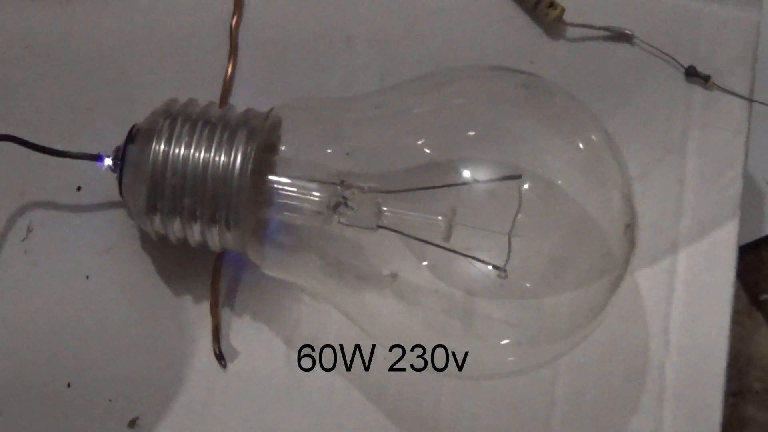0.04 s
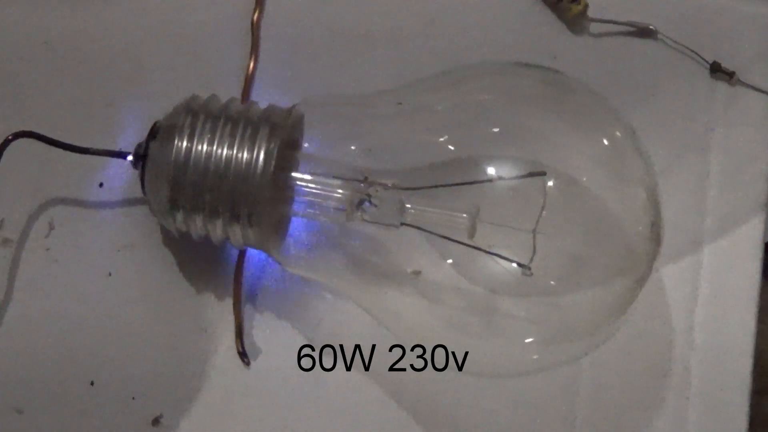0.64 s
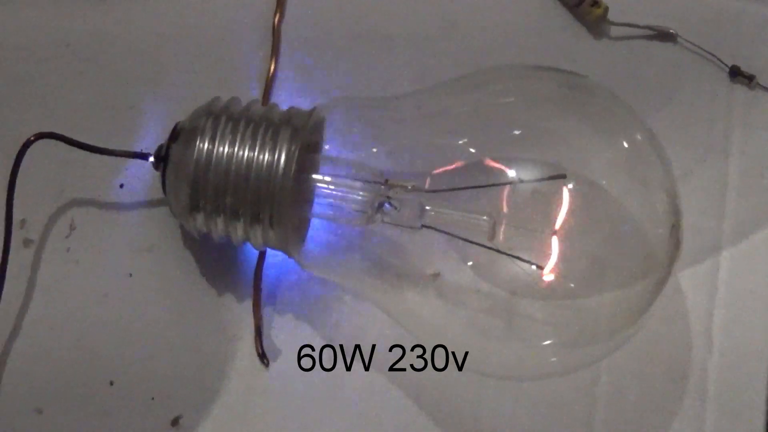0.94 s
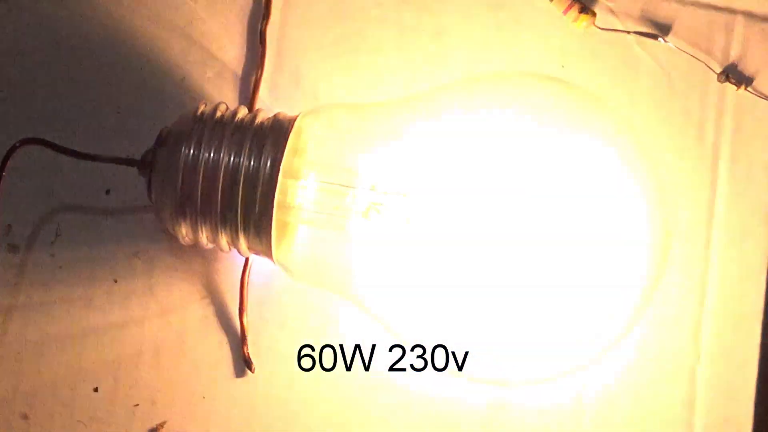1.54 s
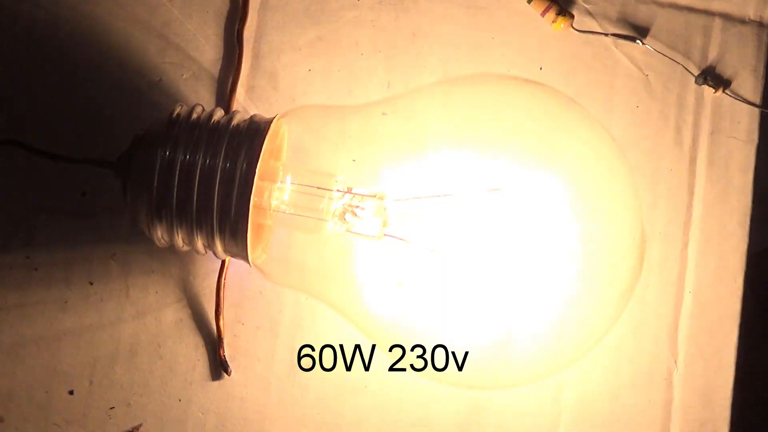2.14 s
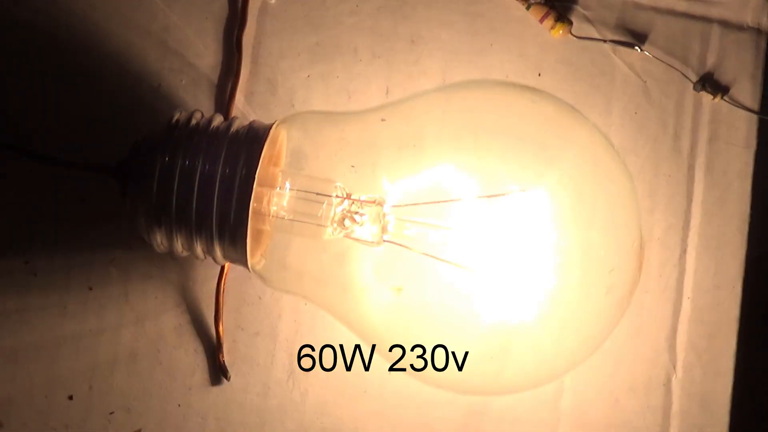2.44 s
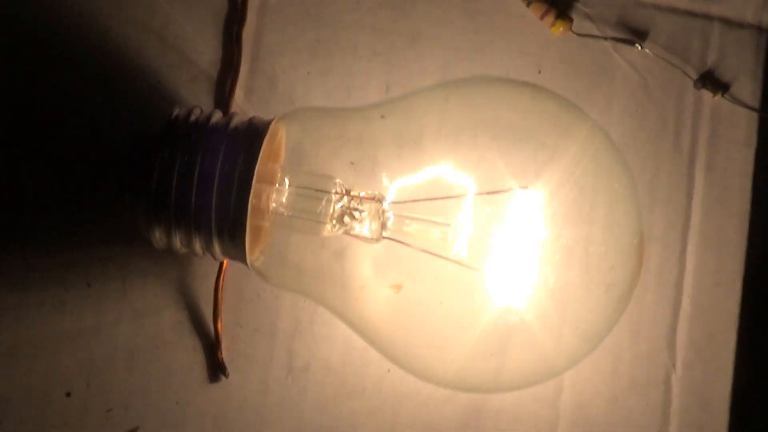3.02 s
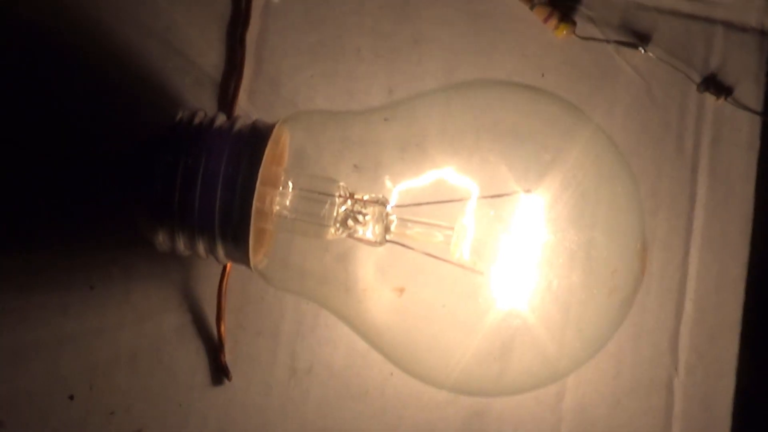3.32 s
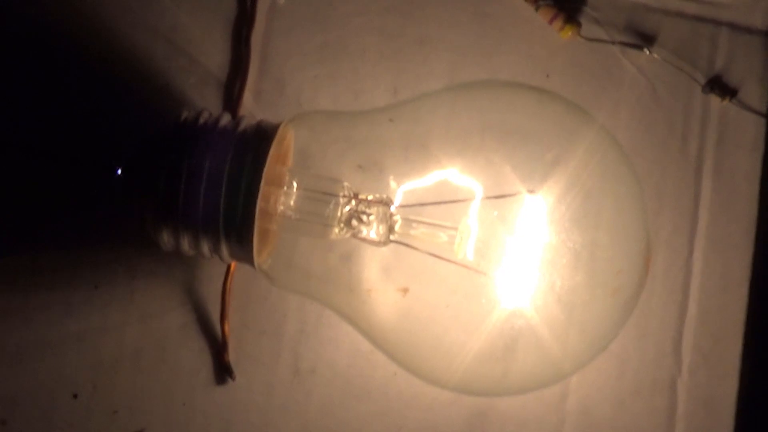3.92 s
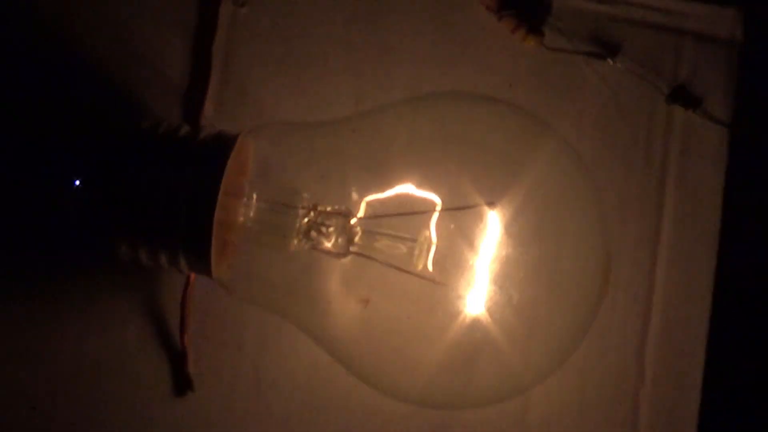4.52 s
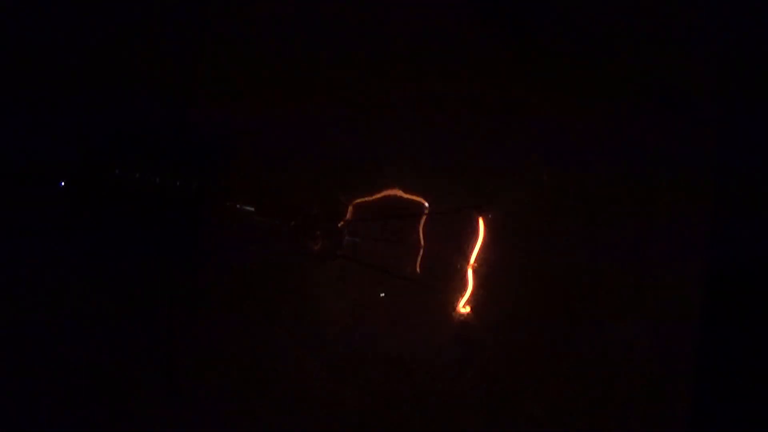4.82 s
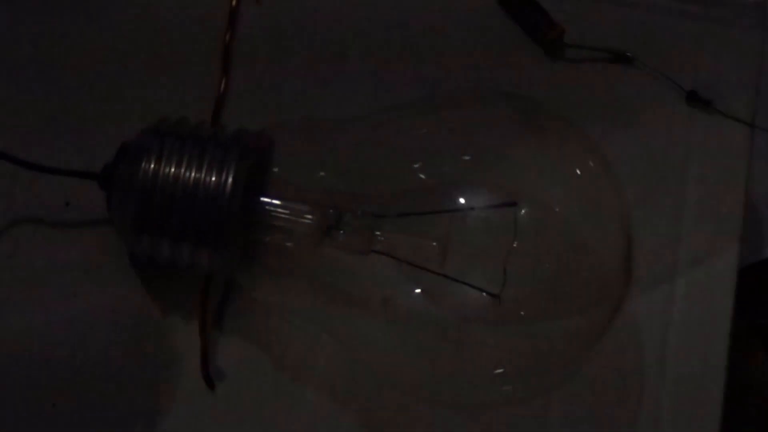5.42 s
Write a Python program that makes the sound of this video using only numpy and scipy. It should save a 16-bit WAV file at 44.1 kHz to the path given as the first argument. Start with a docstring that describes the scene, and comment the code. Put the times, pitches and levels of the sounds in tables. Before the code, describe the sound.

Sparks spit rapidly at a light bulb's metal cap over the quiet rattling buzz of a power supply. After about a second they merge into a loud, harsh sizzle, with a few sharp cracks and a faint low buzz underneath. The arc wavers, throws hissing sprays, surges again and sputters out abruptly. A few faint ticks remain, all heard close up in a small quiet room.

```python
"""A high-voltage discharge at the cap of a light bulb, on a table in a small room, close to a stereo pair.
First the dimmed mains supply knocks at each firing, and sparks spit in every half cycle. After a second
the power is turned up and they merge into a harsh sizzle; from 2.4 s the loaded core buzzes once a cycle.
Later the arc wavers and throws sprays of streamers. The supply is turned down with a tinnier knock,
the arc sputters out at 4.8 s, and a few faint ticks are left over the room air."""
import sys
import numpy as np
from scipy import signal
from scipy.fft import rfft, irfft
from scipy.io import wavfile
from scipy.ndimage import uniform_filter1d

SR = 44100
rng = np.random.default_rng(int(sys.argv[2]) if len(sys.argv) > 2 else 0)


def to_wav(sig):
    """Store sig (one row per channel, or 1-D mono) as 16-bit WAV at the path in sys.argv[1].

    Samples outside -1..1 are clipped; the rate is SR.
    """
    pcm = np.clip(np.atleast_2d(sig), -1, 1) * 32767
    pcm = np.round(pcm).astype(np.int16)
    wavfile.write(sys.argv[1], SR, pcm.T)  # frames by channels


N = 249606
TIME, BINS = np.arange(N) / SR, np.fft.rfftfreq(N, 1 / SR)
MAINS_HZ, CROSSING_S = 50, -.0015  # the mains and one of its zero crossings
SPUTTER_S = 4.801  # the arc breaks up here


def amp(db):
    """Decibels to gain."""
    return 10 ** (np.asarray(db) / 20)


def unit(x):
    """Scales to rms 1."""
    return x / np.sqrt(np.mean(x ** 2) + 1e-20)


def steadied(x, size=1300):
    """Holds the short-term rms at 1."""
    return x / np.sqrt(abs(uniform_filter1d(uniform_filter1d(x ** 2, size), size)) + 1e-12)


def curve(rows, t=TIME, column=1):
    """One column of a table, joined by straight lines in time."""
    rows = np.array(rows)
    return np.interp(t, rows[:, 0], rows[:, column])


def spectrum(points, hz=BINS):
    """Points joined by straight lines on a log-frequency axis."""
    f, value = np.transpose(points)
    return np.interp(np.log(hz + 1), np.log(f), value)


def gate(start, length, rise_s, fall_s):
    """Attack, hold and exponential release."""
    return np.clip((TIME - start) / rise_s, 0, 1) * np.exp(-np.maximum(TIME - start - length, 0) / fall_s)


def shaped(x, gain):
    """Filters by a gain for each frequency bin."""
    return irfft(rfft(x) * gain, N)


def coloured(x, db):
    """Causal filter: clicks keep a sharp front and ring afterwards."""
    cepstrum = irfft(np.log(amp(db)), N)
    cepstrum[1:N // 2] *= 2
    cepstrum[N // 2 + 1:] = 0
    return shaped(x, np.exp(rfft(cepstrum)))


def ring(x, modes):
    """Damped resonances of a struck body."""
    return shaped(x, sum(amp(db) / (1 + 1j * (BINS ** 2 - hz ** 2) / (width * BINS + 1e-9))
                         for hz, width, db in modes))


def clicks(times, sizes):
    """Impulses at the given times."""
    at = np.round(times * SR).astype(int)
    inside = (at >= 0) & (at < N)
    return np.bincount(at[inside], sizes[inside], N)


# Stereo width of the air and echoes, almost mono in the top treble: f/Hz, side against mid/dB
SIDE_LEVEL = [(50, -30.5), (125, -23), (280, -5), (1000, -5.5), (3000, -4.5), (8000, -4), (13000, -19.5)]
def diffuse(mid, side):
    """Spreads sound to left and right, narrow in the bass and the top treble."""
    side = shaped(side, amp(spectrum(SIDE_LEVEL)))
    return np.array([mid + side, mid - side])


# Colour of the air all around the table: f/Hz, level/dB
AIR_COLOUR = [(20, -21), (50, -8), (90, -5), (150, -4), (215, 1), (300, -7.5), (420, -5.5), (620, -11.5),
              (720, -3), (1000, -6.5), (1700, -14), (5000, -17), (15800, -24.5)]
# Room tone at the microphones: t/s, air level/dB, hum level/dB
ROOM_TONE = [(0, -63.5, -82), (1.5, -63, -77), (2.2, -57.5, -85), (4.85, -54, -69), (5.2, -57, -68)]
def room_tone():
    """Quiet, wide room air with a faint mains hum in the centre."""
    air = diffuse(*shaped(rng.standard_normal((2, N)), amp(spectrum(AIR_COLOUR))))
    hum = np.sqrt(2) * np.sin(2 * np.pi * 2 * MAINS_HZ * TIME)
    return unit(air) * amp(curve(ROOM_TONE)) + hum * amp(curve(ROOM_TONE, column=2))


# The dimmer, firing earlier for more power: t/s, delay after the zero crossing/ms
FIRING_DELAY = [(0, 3.5), (.25, 2.52), (.9, 2.53), (1.27, 0.74), (4.55, .75), (4.72, 1.28), (4.94, 3.5)]
def knock(levels, modes, edge_hz, uneven_db=2.0, skew_ms=0.28, lag_ms=0.12, scatter_db=0.5):
    """Each firing jolts the supply; late firings are shaky and differ between the two half cycles."""
    count = np.arange(int(2 * MAINS_HZ * N / SR))
    crossings, odd = CROSSING_S + count / (2 * MAINS_HZ), count % 2
    delay_ms = curve(FIRING_DELAY, crossings)
    shaky = np.clip((delay_ms - .6) / 2, 0, 1)
    unsteady = (crossings > .1) & (crossings < .93)
    jitter_ms = np.where(unsteady, .13, .06) * rng.standard_normal(len(count))
    delay_ms = delay_ms + lag_ms + shaky * (skew_ms * (1 - odd) + jitter_ms)
    sizes = amp(shaky * (uneven_db * odd + scatter_db * rng.standard_normal(len(count))))
    jolts = clicks(crossings + delay_ms / 1000, sizes)
    band_db = spectrum([(200, -14), (400, 0), (edge_hz, 0), (0.98 * edge_hz, -12), (3 * edge_hz, -22)])
    ringing = steadied(coloured(ring(jolts, modes), band_db))
    return ringing * amp(curve(levels)) * (TIME >= levels[0][0]) * (TIME < levels[-1][0])


# Knock of the supply, close by: t/s, level/dB
OPENING_KNOCK = [(0, -49), (.2, -45), (1.08, -42), (1.3, -51), (1.7, -51.5), (2.05, -68)]
# Resonances of its body: f/Hz, width/Hz, level/dB
OPENING_MODES = [(402, 17, -27), (490.7, 11, 4), (737, 18, -31), (891, 35, 9), (990, 41, 2.5),
                 (1157, 106, 7.5), (1280, 54, 4.5), (1390, 53, 0.5), (1689, 95, 9), (1986, 200, 1),
                 (2670, 170, -3)]
def opening_knock():
    """The dimmed supply rings at every firing and fades once the power is up."""
    return knock(OPENING_KNOCK, OPENING_MODES, edge_hz=2700)


def sparks(per_s, size_db, burst_db=2.0, strike_ms=2.5, rise_ms=0.53, burn_ms=5.6, quench_ms=0.89):
    """The gap breaks down again and again, from strike_ms into each half cycle until the voltage fails."""
    delay_ms = curve(FIRING_DELAY)
    halves = 2 * MAINS_HZ * (TIME - CROSSING_S - strike_ms / 1000)
    age_ms = halves % 1 * 1000 / (2 * MAINS_HZ)
    burst = (1 - np.exp(-age_ms / rise_ms)) / (1 + np.exp((age_ms - burn_ms) / quench_ms))
    burst *= amp(-2.6 * age_ms * np.maximum(delay_ms - 1, 0))  # fades sooner after a late firing
    # The earlier the firing, the more sparks burn on between bursts.
    carry = np.exp(-delay_ms / .72) / (1 + (delay_ms / 2) ** 4)
    drive = carry + (1 - carry) * burst
    strikes = rng.random(N) < per_s / SR * np.sqrt(drive)
    # Bursts differ less from one another once they merge.
    burst_scatter = (1 - carry) * rng.standard_normal(N)[np.floor(halves).astype(int)]
    scatter_db = size_db * np.minimum(rng.standard_normal(N), 1.6) + burst_db * burst_scatter
    return steadied(strikes * drive ** (1 / 4) * amp(scatter_db) * rng.choice([-1, 1], N))


# One spark at close range: f/Hz, level/dB
SPARK_COLOUR = [(100, -45.5), (700, -32), (1400, -23.5), (2100, -17.5), (2600, -15), (3050, -19),
                (3600, -8), (4900, -10), (6800, -6), (7500, 0.5), (11100, -1), (12300, -13), (14000, -27),
                (16000, -26)]
# Peaks and hollows from the bulb and table beside it: f/Hz, width/Hz, gain/dB
BULB_RIPPLE = [(4334, 110, -4), (6170, 260, 2), (6390, 120, -7), (8300, 33, -0.5), (8270, 96, -7.5),
               (8790, 127, -4), (9340, 242, 10), (9468, 272, -8), (9800, 380, -1.5), (12310, 230, -16)]
def spark_colour():
    """Spectrum in dB of one spark near glass and table."""
    ripple_db = sum(db * np.exp(-.5 * ((BINS - hz) / width) ** 2) for hz, width, db in BULB_RIPPLE)
    return spectrum(SPARK_COLOUR) + ripple_db


# Discharge at the bulb's cap, close to the microphones: t/s, level/dB
ARC_LEVEL = [(0, -49.5), (.2, -41.5), (.67, -40), (.69, -33), (1.1, -26.5), (1.3, -29.5), (1.5, -26.5),
             (2.55, -25), (2.7, -25.5), (3.36, -25.5), (3.44, -31.5), (3.85, -29.5), (4.0, -34),
             (4.06, -41.5), (4.18, -33.5), (4.56, -29), (4.74, -26), (4.79, -40.5)]
# Moments when the arc grips harder: t/s, gain/dB, length/s
ARC_SURGES = [(1.342, 3.5, 0.094), (1.44, 3, 0.056), (1.545, 3, 0.18), (1.883, 1.9, 0.2),
              (2.176, 3.5, 0.12), (2.305, 2, 0.24), (3.685, 2, 0.12), (4.372, 6, 0.023), (4.451, 8, 0.029),
              (4.504, 4.5, 0.029), (4.566, 3, 0.12)]
# One streamer at close range: f/Hz, level/dB
STREAMER_COLOUR = [(300, -26.5), (4000, -15.5), (8000, -5), (10500, 0), (13000, -4), (14500, -13.5),
                   (16000, -16.5)]
# Sprays of streamers out of the gap: t/s, level/dB, length/s
SPRAYS = [(0.154, -45, 0.14), (0.627, -37.5, .016), (3.54, -38, 0.054), (3.684, -28.5, 0.078),
          (3.949, -28, 0.011), (3.987, -32, 0.027), (4.129, -28, 0.011), (4.157, -25, 0.0054),
          (4.384, -29, 0.053), (4.497, -32, .04), (4.56, -32, .155)]
def arc(full_db=-25, fizz_db=-37, fizz_follow=0.66):
    """Thick sparks carry the current and surge; thin streamers fizz along and break out in sprays."""
    thick = unit(coloured(sparks(per_s=5200, size_db=4.0), spark_colour()))
    thin = unit(coloured(sparks(per_s=5000, size_db=3.8), spectrum(STREAMER_COLOUR)))
    surge_db = sum(db * gate(s, length, rise_s=0.0069, fall_s=0.005) for s, db, length in ARC_SURGES)
    arc_db = curve(ARC_LEVEL) + surge_db
    fizz = amp(fizz_db + fizz_follow * (arc_db - full_db))
    sprays = sum(amp(db) * gate(s, length, rise_s=0.0038, fall_s=0.0026) for s, db, length in SPRAYS)
    return (thick * amp(arc_db) + thin * np.hypot(fizz, sprays)) * (TIME < SPUTTER_S)


def volleys(rows, colour_db, per_s=9000, quench_s=0.002):
    """Short, dense runs of clicks, one for each row of t/s, level/dB, length/s."""
    envelope = sum(amp(db) * (TIME >= s) * np.exp(-np.maximum(TIME - s - length, 0) / quench_s)
                   for s, db, length in rows)
    crackle = steadied(rng.standard_normal(N) * (rng.random(N) < per_s / SR), size=100)
    return coloured(crackle * envelope, colour_db) / np.sqrt(np.mean(amp(colour_db) ** 2))


# Sharp cracks at the cap, close by: t/s, level/dB, length/s
SPARK_FLARES = [(.0315, -37, 0.0025), (.052, -38, 0.0013), (.111, -38, 0.0014), (.182, -33, 0.0017),
                (.3505, -33, .002), (.4108, -26, .0008), (.4922, -31, .001), (.682, -37, 0.0025),
                (2.341, -18, .0017), (2.373, -17, 0.0025), (2.391, -18, 0.0033), (2.613, -14.5, 0.0029)]
def flares():
    """Single strong bursts of sparks stand out of the arc."""
    return volleys(SPARK_FLARES, spark_colour())


# A soft low handling thump, then faint low swells and a faint ring, all in the centre:
# peak t/s, f/Hz, width/Hz, level/dB, half length/s
THUMP_AND_SWELLS = [(2.125, 100, 48, -59.5, .1), (3.86, 58, 4.5, -59, .3), (5.028, 57.4, 4.9, -62, .2),
                    (5.37, 720, 35, -62, 0.075)]
def thump_and_swells():
    """Handling thump, low swells and ring: each a narrow, wavering band of noise that rises and fades."""
    sound = np.zeros(N)
    for peak_s, hz, width_hz, db, half_s in THUMP_AND_SWELLS:
        band = shaped(rng.standard_normal(N), np.exp(-.5 * ((BINS - hz) / width_hz) ** 2))
        sound += steadied(band, size=6000) * amp(db) / (1 + ((TIME - peak_s) / half_s) ** 2)
    return sound


# Resonances of the supply's core, close by: f/Hz, width/Hz, level/dB
CORE_MODES = [(162, 27, 6.5), (308, 70, -3), (463, 80, 2.5), (592.6, 7.8, 0), (938, 115, 5),
              (1130, 140, -8), (1382, 140, 2.5), (1910, 350, -5.5), (2510, 280, -3.5)]
def core_buzz(on_s=2.4, off_s=4.95, snap_db=-50.5, hum_db=-76, lag_s=.0116, rebound_s=.003234):
    """Under full load the core hums, snaps once a cycle and rebounds."""
    times = lag_s + np.arange(int(MAINS_HZ * N / SR)) / MAINS_HZ
    times += .4 * curve(FIRING_DELAY, times) / 1000  # a later firing drags the snap along
    sizes = amp(rng.standard_normal(len(times)))  # 1 dB of scatter
    snaps = clicks(times, sizes) + 0.32 * clicks(times + rebound_s, sizes)
    hum = np.sqrt(2) * np.cos(2 * np.pi * 3 * MAINS_HZ * (TIME - lag_s))
    load = gate(on_s, off_s - on_s, rise_s=.03, fall_s=0.0045)
    return (unit(ring(snaps, CORE_MODES)) * amp(snap_db) + hum * amp(hum_db)) * load


# Last knocking of the supply, close by: t/s, level/dB
CLOSING_KNOCK = [(4.55, -60), (4.72, -49.5), (4.8, -43.5), (4.94, -52.5)]
# Its higher resonances: f/Hz, width/Hz, level/dB
CLOSING_MODES = [(1030, 62, -2), (1270, 120, -0.5), (2570, 170, -8), (3190, 120, 1.5)]
def closing_knock():
    """The firings ring tinnier while the supply is turned down."""
    return knock(CLOSING_KNOCK, CLOSING_MODES, edge_hz=3140)


def sputter(count=14, level_db=-27, drop_db=10.5, volley_s=0.0031, weak_life_s=0.041, strong_life_s=.13):
    """The dying arc spits every half cycle, then every other one, as each polarity in turn fails."""
    ages = np.arange(count) / (2 * MAINS_HZ)
    spent = ages / np.resize([weak_life_s, strong_life_s], count)
    rows = [(SPUTTER_S + age, level_db - drop_db * used ** 6, volley_s) for age, used in zip(ages, spent)]
    return volleys(rows, spark_colour())


# Faint ticks near the microphones: t/s, level/dB
LAST_TICKS = [(5.408, -64), (5.59, -58), (5.625, -44.5)]
# Their colour: f/Hz, level/dB
TICK_COLOUR = [(200, -9), (1500, -22), (4000, -14.5), (5200, 6), (8000, -6), (11000, -16), (16000, -22)]
def ticks():
    """Thin, millisecond-long ticks after the arc has gone out."""
    return volleys([(s, db, .001) for s, db in LAST_TICKS], spectrum(TICK_COLOUR), quench_s=0.0013)


# Decay of the small room around the table: f/Hz, t60/s
ROOM_DECAY = [(150, 0.12), (1000, 0.48), (4000, 0.055), (14000, 0.15)]
def reflections(x):
    """Sparse echoes from the walls; the midrange rings longest."""
    taps = rng.choice([-1., 1.], (2, SR // 2)) * (rng.random((2, SR // 2)) < .12)
    taps *= TIME[:SR // 2] > .002  # nothing returns in the first 2 ms
    hz, t, bands = signal.stft(taps, SR, nperseg=256)
    bands *= np.exp(-np.log(1000) * t / spectrum(ROOM_DECAY, hz)[:, None])
    tails = signal.istft(bands, SR, nperseg=256)[1]
    tails /= np.linalg.norm(tails[0])
    return diffuse(*signal.fftconvolve(x[None], tails, axes=1)[:, :N])


# Lean toward the left microphone: f/Hz, left against right/dB
LEFT_LEAN = [(150, 0), (500, 2), (1000, 3.1), (2000, 1.6), (4400, .7), (8500, .9), (13000, 0)]
def scene(spark_room_db=-12, supply_room_db=-12.5):
    """Bulb and supply sit close to the microphones, slightly left, with the room behind them."""
    discharge = arc() + flares() + sputter() + ticks()
    supply = opening_knock() + core_buzz() + closing_knock()
    echoes = reflections(amp(spark_room_db) * discharge + amp(supply_room_db) * supply)
    lean_db = spectrum(LEFT_LEAN) / 2
    near = shaped(discharge + supply + echoes, amp([lean_db, -lean_db]))
    return near + room_tone() + thump_and_swells()


def record(dry):
    """The recorder passes sound up to 15.9 kHz."""
    lowpass = signal.firwin(611, 15900, window=("kaiser", 9), fs=SR)
    return signal.oaconvolve(dry, lowpass[None], "same")


dry = scene()
out = record(dry)
to_wav(out)
```